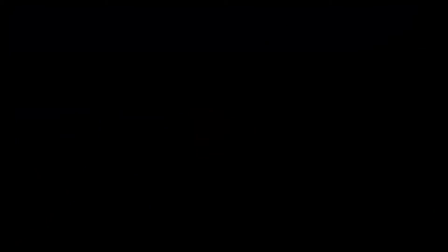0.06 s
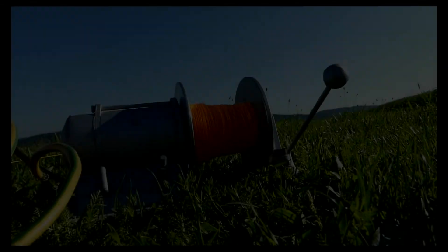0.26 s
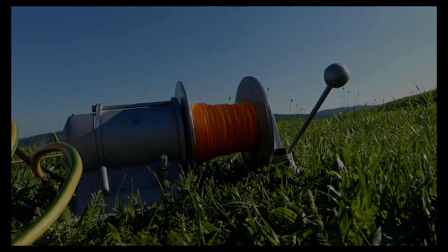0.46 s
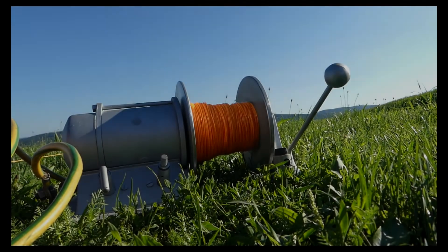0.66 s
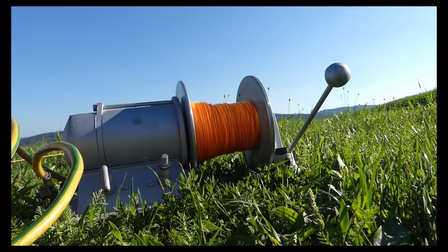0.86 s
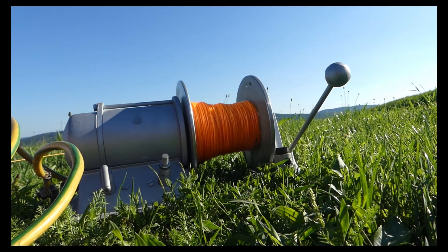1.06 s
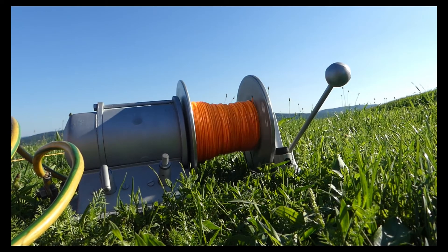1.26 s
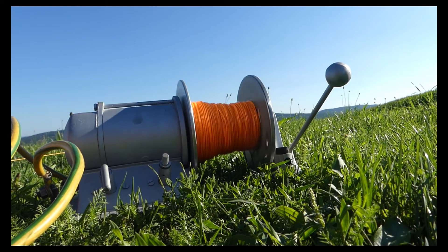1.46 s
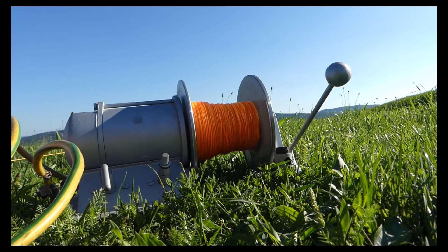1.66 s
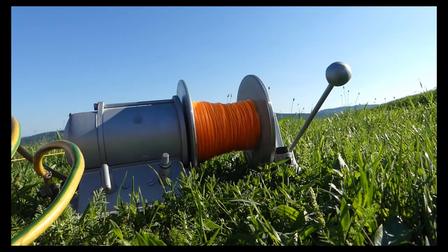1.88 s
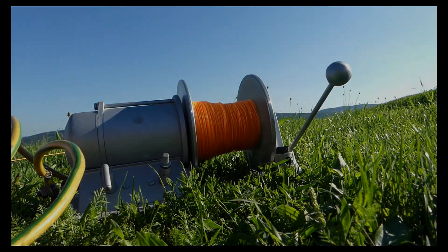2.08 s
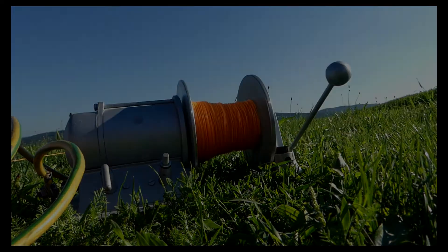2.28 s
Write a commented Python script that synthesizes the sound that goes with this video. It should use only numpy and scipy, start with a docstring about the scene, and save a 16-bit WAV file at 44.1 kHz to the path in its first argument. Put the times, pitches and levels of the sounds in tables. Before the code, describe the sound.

A small electric winch grinds and whines at constant speed in an open field, with gusty wind thumps

```python
"""An electric winch runs steadily on the grass of an open field, close to the microphone.
Its gear teeth rattle the metal housing, which rings at many pitches that swell once and twice with each turn
of a gear wheel, over a broad rasp, steady whine tones, a low drone and a high whistle.
Sharp snaps, probably brush sparks, are short wave packets; metal pings are fading sine tones.
Wind gusts buffet the microphone: lumpy low noise with single thumps and short flutters."""
import sys
import numpy as np
from scipy import signal
from scipy.fft import rfft, irfft
from scipy.io import wavfile

SR = 44100
rng = np.random.default_rng(int(sys.argv[2]) if len(sys.argv) > 2 else 0)


def log_audio(samples):
    """Write samples as a 16-bit WAV file to the path given in sys.argv[1]."""
    # one column per channel
    frames = np.atleast_2d(samples).T
    # limit to full scale, then quantise
    limited = np.clip(frames, -1, 1)
    pcm = np.round(limited * 32767).astype(np.int16)
    wavfile.write(sys.argv[1], SR, pcm)


N = 102532
TIME = np.arange(N) / SR


def from_db(db):
    """Turn decibels into a gain."""
    return 10 ** (np.asarray(db) / 20)


def rms_one(x):
    """Scale a sound to an average (rms) strength of 1."""
    return x / np.sqrt(np.mean(x ** 2) + 1e-20)


def in_time(rows):
    """Draw straight lines between (time, value) points, one value per sample."""
    return np.interp(TIME, *np.transpose(rows))


def pan(left_right_db):
    """Left and right gains that differ by this many dB; above zero is louder on the left."""
    return from_db(np.array([[left_right_db], [-left_right_db]]) / 2)


def widen(pair, side_db):
    """Use two unrelated signals as the middle and side of a stereo pair."""
    middle, side = pair[0], from_db(side_db) * pair[1]
    return middle + side * np.array([[1], [-1]])


def shelve(x, spectrum, amount=1):
    """Filter by a smooth curve of (pitch_hz, level_db), its dB scaled by amount."""
    hz, db = np.transpose(spectrum)
    bin_hz = np.arange(N // 2 + 1) * SR / N
    curve_db = np.interp(np.log(bin_hz + 1), np.log(hz), db)
    return irfft(rfft(x) * from_db(amount * curve_db), N)


def colour(x, spectrum):
    """Give a flat signal a smooth spectrum; rms 1."""
    return rms_one(shelve(x, spectrum))


def resonate(x, hz, width_hz):
    """A two-pole resonance: it passes a band around one pitch, with gain 1 at its top."""
    r = np.exp(-np.pi * width_hz / SR)
    feed = np.array([1, 0, -1]) * (1 - r * r) / 2
    back = [1, -2 * r * np.cos(2 * np.pi * hz / SR), r * r]
    return signal.lfilter(feed, back, x + 1e-18)


def resonate_twice(x, hz, width_hz):
    """The same resonance two times over, for a cleaner band."""
    return resonate(resonate(x, hz, width_hz), hz, width_hz)


def pulse(hz, width_hz, size, order=2):
    """A short, heavily damped wave packet of height 1; a higher order rounds its onset."""
    wave = signal.unit_impulse(size)
    for _ in range(order):
        wave = resonate(wave, hz, width_hz)
    return wave / np.abs(wave).max()


def add(out, start_s, sound):
    """Mix a sound in at a given time."""
    i = int(np.clip(round(start_s * SR), 0, N - 1))
    out[..., i:i + sound.shape[-1]] += sound[..., :N - i]


# single eddies that thump the microphone: start_s, relative level_db, pitch_hz
EDDY_THUMPS = [(.162, -19, 137), (0.204, -22.5, 315), (0.234, -27, 132), (0.282, -27.5, 110),
               (0.302, -29.5, 130), (0.43, -31, 84), (.493, -27.5, 122), (0.53, -25.5, 95),
               (0.546, -24, 197), (0.573, -24.5, 136), (0.719, -26, 224), (0.751, -25.5, 115),
               (0.778, -17.5, 171), (.883, -27, 160), (.912, -26.5, 138), (1.01, -33.5, 85),
               (1.107, -27.5, 106), (1.437, -28.5, 176), (1.538, -45, 132), (1.553, -29.5, 116),
               (2.121, -25.5, 182)]
THUMP_WIDTH = 0.78   # share of the thump's pitch
FLUTTER_HZ, FLUTTER_WIDTH_HZ, FLUTTER_PEAK_S = 285, 250, 0.0051
FLUTTER_DB, FLUTTER_PAN_DB = -12, -6


def eddies():
    """Each eddy thumps both ports alike, then breaks up into a brief flutter that differs on each."""
    thumps, stir = np.zeros(N), np.zeros(N)
    # rises to 1 at FLUTTER_PEAK_S, then dies away
    breakup = TIME / FLUTTER_PEAK_S * np.exp(1 - TIME / FLUTTER_PEAK_S)
    for start_s, level_db, hz in EDDY_THUMPS:
        add(thumps, start_s, from_db(level_db) * pulse(hz, THUMP_WIDTH * hz, size=2048))
        add(stir, start_s, from_db(level_db) * breakup)
    flutter = rms_one(resonate_twice(rng.standard_normal((2, N)), FLUTTER_HZ, FLUTTER_WIDTH_HZ))
    return thumps + from_db(FLUTTER_DB) * pan(FLUTTER_PAN_DB) * stir * flutter


# wind pressure on the microphone, the rise and fall of the gusts: time_s, relative level_db
GUST_LEVEL = [(0.08, -46), (0.14, -40), (0.17, -31), (0.23, -26.5), (0.28, -33), (0.38, -42), (0.56, -27),
              (0.64, -38.5), (0.78, -26.5), (0.84, -49), (0.88, -41), (0.93, -32), (0.97, -55), (1.01, -36),
              (1.06, -45), (1.11, -29.5), (1.14, -39), (1.41, -39), (1.44, -34), (1.5, -41), (1.56, -26.5),
              (1.59, -51), (1.7, -62.5), (2.1, -53), (2.11, -34.5), (2.26, -49), (2.32, -45)]
# tone of the wind rumble: pitch_hz, relative level_db (per Hz)
WIND_TONE = [(25, -38), (50, -15), (80, -1), (125, -1), (200, -8), (320, -29.5), (550, -39), (1200, -28),
             (4000, -84)]
WIND_DB, WIND_SIDE_DB = -3.5, -8.5   # the side level is relative to the middle
LUMP_DB, LUMP_RATE_HZ, PORT_CUT_HZ = -1, 31, 49


def wind():
    """Lumpy low turbulence follows the gusts, with single eddies on top; the deepest bass is cut."""
    lumps = rms_one(resonate(rng.standard_normal(N), LUMP_RATE_HZ, LUMP_RATE_HZ))
    turbulence = colour(rng.standard_normal((2, N)), WIND_TONE)
    rumble = rms_one(turbulence * from_db(LUMP_DB * lumps))
    gusts = widen(rumble, WIND_SIDE_DB) * from_db(WIND_DB + in_time(GUST_LEVEL))
    bass_cut = signal.butter(2, PORT_CUT_HZ, "high", fs=SR, output="sos")
    return signal.sosfilt(bass_cut, gusts + eddies())


# brief rubbing contacts: start_s, level_db, brightness_db (per octave), rise_s (time constant)
PING_CONTACTS = [(2.005, -23, 5, .008), (2.03, -33, 13, .002), (2.056, -25, -11, .003),
                 (2.0773, -24, -3, .001)]
# ringing modes of the metal part: pitch_hz, level_db (added to the contact's), fade_s (to fall by 60 dB)
PING_RINGS = [(1513, -13, 0.05), (3391, 3.5, 0.062), (5710, -7, 0.125)]


def pings():
    """Brief rubbing contacts set a metal part ringing; brighter contacts favour its upper modes."""
    out = np.zeros(N)
    middle_hz = PING_RINGS[1][0]
    for start_s, contact_db, brightness_db, rise_s in PING_CONTACTS:
        for hz, mode_db, fade_s in PING_RINGS:
            level_db = contact_db + mode_db + brightness_db * np.log2(hz / middle_hz)
            rise = 1 - np.exp(-TIME / rise_s)
            fade = np.exp(-np.log(1000) * TIME / fade_s)
            add(out, start_s, from_db(level_db) * rise * fade * np.sin(2 * np.pi * hz * TIME))
    return out


# sharp snaps: time_s, relative level_db (whole snap), crack_db (extra level of the lower crack)
SNAP_EVENTS = [(0.099, -11, 0), (0.1428, -9, 4), (0.1579, -4.5, -5), (0.1654, -10, -6), (0.201, -14, 0),
               (0.299, -12, 0), (0.335, -5, -10), (0.5, -10.5, -4), (0.5228, -12.5, -18), (0.5654, -19, -6),
               (0.7635, -19, -10), (0.8218, -5, -15), (0.9264, -8, -11), (0.9555, -5.5, -19),
               (0.9837, -10, -15), (1.1023, -4.5, -10), (1.2703, -4.5, -8), (1.2873, -6.5, -14),
               (1.3157, -3, -15), (1.3376, -9.5, -12), (1.375, -14.5, -18), (1.669, -8, -1),
               (1.7073, -8.5, -5), (1.7153, -4.5, -13), (1.7428, -5.5, -8), (1.8091, -3.5, -13),
               (1.955, -14, -6), (1.974, -10, -15), (1.9841, -14, -11), (2.0303, -7, 1.5),
               (2.0462, -10, -3), (2.056, -9, -7), (2.0755, -4.5, -15)]
SNAP_HZ, SNAP_WIDTH_HZ, SNAP_DB = 10700, 14000, -.5
SNAP_EDGE_HZ = 8540   # little of the bright packet lies below this
SNAP_LEAD_S, SNAP_PAN_DB = .0003, -1.2   # a snap starts this long before its listed time
CRACK_HZ, CRACK_WIDTH_HZ, CRACK_DB = 4900, 4200, -1.5
SCATTER_S, SCATTER_DECAY_S = 0.0056, 0.0095   # where it stops; time constant of its fade
SCATTER_DB, SCATTER_SIDE_DB = -1.5, -9.5


def snaps():
    """Each snap is a bright packet with a lower crack, then a few milliseconds of scatter off the metal."""
    out, age = np.zeros((2, N)), TIME[:512]
    bright = pulse(SNAP_HZ, SNAP_WIDTH_HZ, size=128, order=4)
    bright = signal.sosfilt(signal.butter(10, SNAP_EDGE_HZ, "high", fs=SR, output="sos"), bright)
    bright = bright / np.abs(bright).max()
    crack = pulse(CRACK_HZ, CRACK_WIDTH_HZ, size=128)
    fade = np.exp(-age / SCATTER_DECAY_S) * (age < SCATTER_S)
    for time_s, level_db, crack_db in SNAP_EVENTS:
        paths = widen(rng.standard_normal((2, len(age))), SCATTER_SIDE_DB) * fade
        paths *= from_db(SCATTER_DB) / np.linalg.norm(paths[0])
        paths[:, 0] = 1   # the direct sound
        snap = from_db(SNAP_DB) * bright + from_db(CRACK_DB + crack_db) * crack
        add(out, time_s - SNAP_LEAD_S, from_db(level_db) * signal.fftconvolve(paths, snap[None]))
    return out * pan(SNAP_PAN_DB)


def swell(turn, once_db, once_at, twice_db, twice_at):
    """Tooth pressure rises and falls once and twice a turn, around its usual level."""
    once = once_db * np.cos(2 * np.pi * (turn - once_at))
    twice = twice_db * np.cos(2 * np.pi * 2 * (turn - twice_at))
    return from_db(once + twice)


def ring(x, hz, width_hz):
    """A resonance whose skirts are steepened by a second, wider pass; rms 1."""
    return rms_one(resonate(resonate(x, hz, width_hz), hz, width_hz * 3.5))


TEETH, PINION_TEETH = 84, 23   # pulses per turn of the wheel
TOOTH_DEPTH, PINION_DEPTH = 0.14, 0.19   # how deep they pulse, as a share of the usual strength
RATTLES_PER_S, RATTLE_SPREAD_DB = 2600, 4
RATTLE_SHARE = 0.52   # share of the power in impacts; the rest is sliding friction


def tooth_contact(turn):
    """Two unrelated streams of small impacts and sliding friction, pulsing at the tooth rates."""
    struck = rng.random((2, N)) < RATTLES_PER_S / SR
    direction = rng.choice([-1, 1], (2, N))
    impacts = struck * direction * from_db(RATTLE_SPREAD_DB * rng.standard_normal((2, N)))
    friction = rng.standard_normal((2, N))
    wheel_pulse = TOOTH_DEPTH * np.cos(2 * np.pi * TEETH * turn)
    pinion_pulse = PINION_DEPTH * np.cos(2 * np.pi * PINION_TEETH * turn)
    contact = np.sqrt(RATTLE_SHARE) * rms_one(impacts) + np.sqrt(1 - RATTLE_SHARE) * friction
    return (1 + wheel_pulse + pinion_pulse) * contact


DRONE_HZ, DRONE_WIDTH_HZ, DRONE_DB = 332, 250, -62.5
DRONE_SIDE_DB, DRONE_PAN_DB = 6, -11


def drone(turn):
    """Tooth contact shakes the motor frame at a low, broad resonance, spread wide over the ground."""
    hum = ring(tooth_contact(turn), DRONE_HZ, DRONE_WIDTH_HZ)
    return from_db(DRONE_DB) * pan(DRONE_PAN_DB) * widen(hum, DRONE_SIDE_DB)


# level of the high whistle of the running gear: time_s, level_db
WHISTLE_LEVEL = [(.08, -45.5), (.45, -36), (.8, -40.5), (.95, -39.5), (1.35, -42), (2.3, -41)]
# its throb: once_db (swing once a turn), once_at (turns), twice_db (swing twice a turn), twice_at (turns)
WHISTLE_THROB = (2, 0.28, 0.8, 0.06)
WHISTLE_HZ, WHISTLE_WIDTH_HZ, WHISTLE_SIDE_DB = 9120, 90, -13


def whistle(turn):
    """Friction excites one narrow, high resonance, which throbs with the wheel and slowly changes level."""
    tone = ring(rng.standard_normal((2, N)), WHISTLE_HZ, WHISTLE_WIDTH_HZ)
    throbbing = rms_one(tone * swell(turn, *WHISTLE_THROB))
    return from_db(in_time(WHISTLE_LEVEL)) * widen(throbbing, WHISTLE_SIDE_DB)


# whine tones of the gear train: multiple (waves per turn), level_db
WHINE_TONES = [(63, -55), (65, -63), (89, -49), (165, -55)]
WHINE_WAVER_DB, WHINE_WAVER_HZ, WHINE_PAN_DB = 6, 8.8, 3


def whine(turn):
    """Near-pure tones locked to the wheel, each wavering in strength."""
    out = 0
    for multiple, level_db in WHINE_TONES:
        waver = rms_one(resonate_twice(rng.standard_normal(N), WHINE_WAVER_HZ, WHINE_WAVER_HZ))
        tone = from_db(WHINE_WAVER_DB * waver) * np.sin(2 * np.pi * multiple * turn)
        out = out + from_db(level_db) * rms_one(tone)
    return out * pan(WHINE_PAN_DB)


# tone of the rasp of gears and brushes: pitch_hz, relative level_db (per Hz)
RASP_TONE = [(30, -9), (70, -5), (140, 5.5), (320, 2.5), (500, -3.5), (800, 2.5), (1300, -1.5), (2400, 0),
             (4500, 1), (8000, -4.5), (11000, -3.5), (14000, -5), (16000, -22)]
# stereo width of the rasp: pitch_hz, side_db (side against middle)
RASP_SIDE = [(120, -2.5), (800, -4), (2000, -6), (5500, -10), (6800, 1.5), (8500, -1.5), (10500, -4.5),
             (14000, -3.5)]
# left-right lean of the rasp: pitch_hz, lean_db (each channel takes only a share of it)
RASP_LEAN = [(400, 4), (750, 4.5), (1100, 5), (1500, 0), (4000, 0), (7500, 1), (12000, 0)]
# filter that picks out the hissing top of the rasp: pitch_hz, gain_db
HISS_FILTER = [(5500, -40), (7000, 5)]
# swell of the rasp, then further swell of its hiss:
# once_db (swing once a turn), once_at (turns), twice_db (swing twice a turn), twice_at (turns)
RASP_SURGE = (0.99, 0.37, 1.45, 0.058)
HISS_SURGE = (2, 0.36, 1.65, 0.079)
RASP_DB = -35.5


def rasp(turn):
    """Broad friction noise of gears and brushes, its hiss surging with the wheel, spread in stereo."""
    friction = colour(tooth_contact(turn) * swell(turn, *RASP_SURGE), RASP_TONE)
    hiss = shelve(friction, HISS_FILTER)
    middle, side = friction + hiss * (swell(turn, *HISS_SURGE) - 1)
    side = shelve(side, RASP_SIDE)
    left = shelve(middle + side, RASP_LEAN, 0.44)
    right = shelve(middle - side, RASP_LEAN, -0.55)
    return from_db(RASP_DB) * np.array([left, right])


# speed of the gear wheel: time_s, turns_per_s
WHEEL_SPEED = [(0, 10.25), (.85, 10.27), (1.2, 10.72), (1.5, 10.5), (1.95, 10.55), (2.1, 10.2),
               (2.32, 10.4)]
START_TURN = .26
# rise and fall of the gear noise, used around its own average: time_s, relative level_db
GEAR_LOAD = [(0.09, -34.5), (0.13, -33.5), (0.14, -34.5), (0.17, -37), (1.06, -34), (1.98, -34),
             (2.04, -32), (2.12, -36.5), (2.24, -32.5), (2.31, -34)]
# housing resonances: pitch_hz, width_hz, level_db, once_db (swing once a turn), once_at (turns),
# twice_db (swing twice a turn), twice_at (turns), left_right_db
HOUSING_RINGS = [ (679, 87, -46, -1, 0.44, 1.5, 0.15, 6), (946, 99, -45.5, 4, 0.47, -3, 0.49, 6),
                 (1792, 148, -48, -2.5, 0.78, 0.6, 0.49, 4), (1920, 190, -50.5, 8.5, 1, 3, 0.19, 3),
                 (2933, 140, -42.5, 3.5, 0.53, 2.5, 0.15, 4.5), (3430, 60, -52, 15, 0.45, 10, 0.17, 9),
                 (3826, 250, -47.5, 0, 0.34, 3, 0.27, 3), (4257, 170, -46, -1, 0.35, 1.5, 0.27, 1),
                 (4637, 117, -42, 2, 0.21, -3, 0.13, 5.5), (5100, 104, -40, 0, .39, 2.5, 0.082, 1.5),
                 (5560, 170, -50.5, 2.5, 0.63, -6, 0.053, -12),
                 (6000, 38, -50.5, 3.5, 0.62, 4.7, 0.083, 11), (6330, 24, -53, 45, 0.15, 33, 0.039, -5),
                 (7050, 220, -44, 3.5, 0.44, 2, 0.09, -0.5), (8610, 41, -57, 48, 0.15, 28, 0.03, 5),
                 (9940, 190, -44, 1.5, 0.41, 2, 0.055, -3), (10820, 53, -52, 19, 0.3, 7.5, 0.033, -3),
                 (11420, 210, -45.5, 3, 0.44, -1, 0.054, -1), (12300, 90, -52.5, 8, 0.58, -1, .04, -5)]
HOUSING_SIDE_DB = -18.5


def gearbox():
    """Tooth contact rings the housing, each resonance swelling at its own place in the turn."""
    turn = START_TURN + np.cumsum(in_time(WHEEL_SPEED)) / SR   # turns made so far
    contact = tooth_contact(turn)
    out = rasp(turn) + whine(turn) + drone(turn)
    for hz, width_hz, level_db, *swelling, left_right_db in HOUSING_RINGS:
        ringing = ring(contact * swell(turn, *swelling), hz, width_hz)
        out += from_db(level_db) * pan(left_right_db) * widen(ringing, HOUSING_SIDE_DB)
    load_db = in_time(GEAR_LOAD)
    return out * from_db(load_db - load_db.mean()) + whistle(turn)   # the whistle ignores the load


def scene():
    """The wind and the winch, cutting in after a moment of silence."""
    start_s = .072
    return (wind() + pings() + snaps() + gearbox()) * (TIME > start_s)


LIMIT_DB, LIMIT_SLOPE = -8.5, 0.6   # dB taken off for each dB above the limit
RELEASE_DB_PER_S, LIMIT_ATTACK_S = 82, 0.0047
CUTOFF_HZ = 16500


def record(dry):
    """A limiter ducks briefly after loud peaks; the very top of the treble is cut."""
    peak_db = 20 * np.log10(np.abs(dry).max(axis=0) + 1e-9)
    over_db = np.maximum(peak_db - LIMIT_DB, 0) * LIMIT_SLOPE
    # hold each peak, letting go at a steady rate
    release_db = RELEASE_DB_PER_S * TIME
    held_db = np.maximum.accumulate(over_db + release_db) - release_db
    r = np.exp(-1 / (LIMIT_ATTACK_S * SR))
    ducking_db = signal.lfilter([1 - r], [1, -r], held_db)
    treble_cut = signal.cheby2(18, 60, CUTOFF_HZ, fs=SR, output="sos")
    return signal.sosfilt(treble_cut, dry * from_db(-ducking_db))


dry = scene()
out = record(dry)
log_audio(out)
```